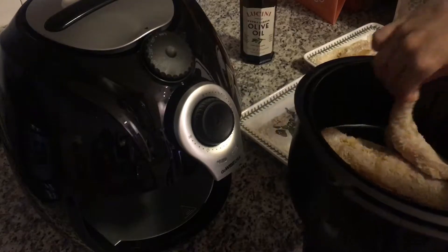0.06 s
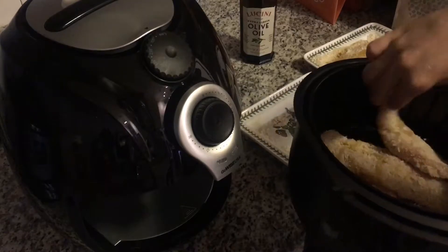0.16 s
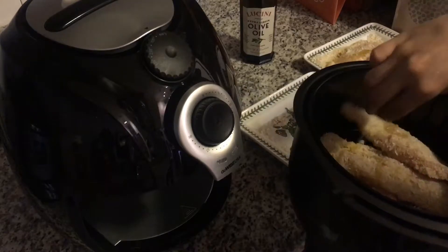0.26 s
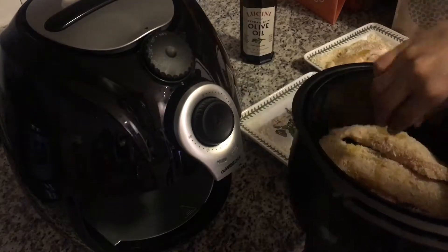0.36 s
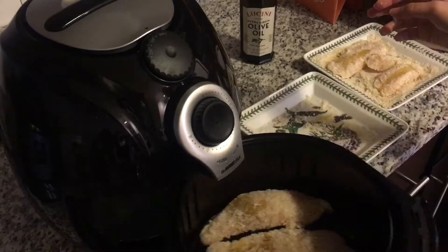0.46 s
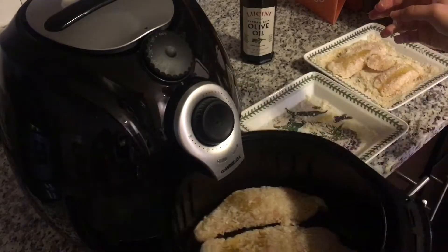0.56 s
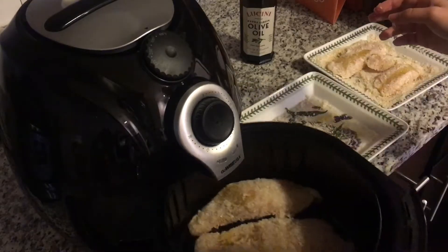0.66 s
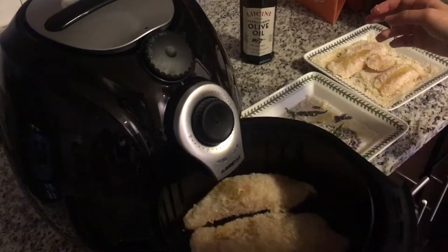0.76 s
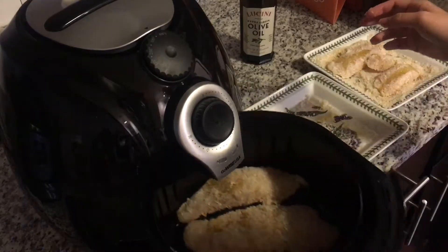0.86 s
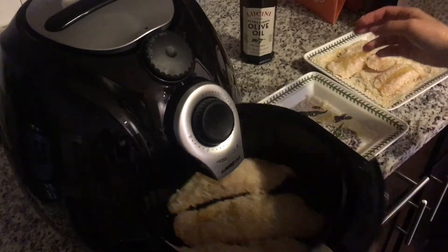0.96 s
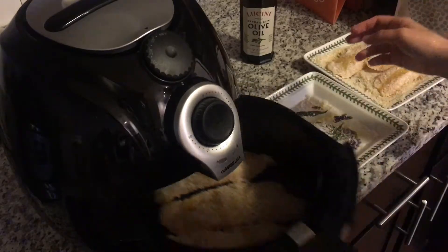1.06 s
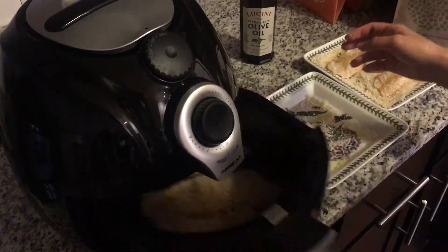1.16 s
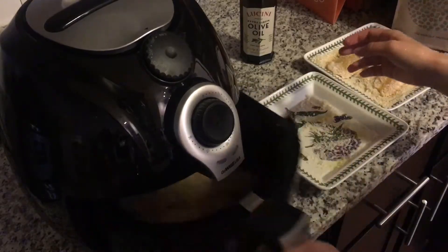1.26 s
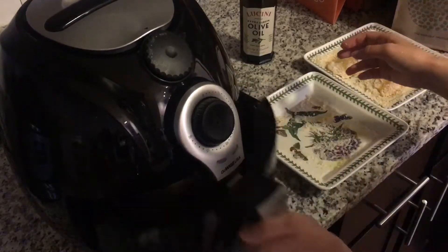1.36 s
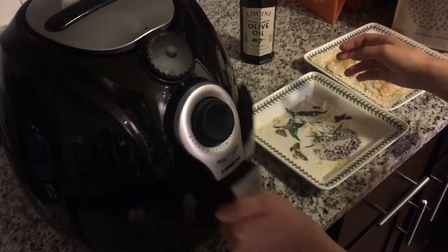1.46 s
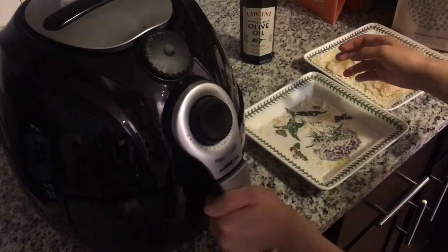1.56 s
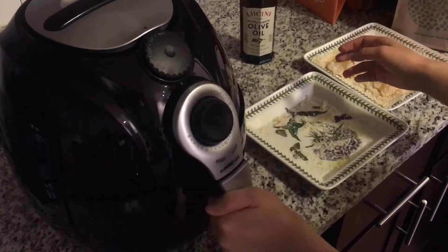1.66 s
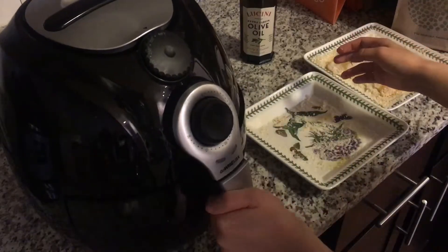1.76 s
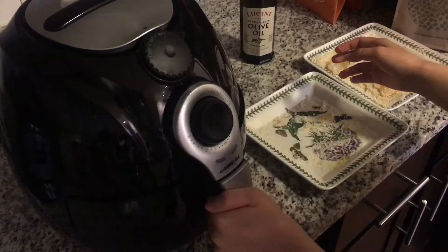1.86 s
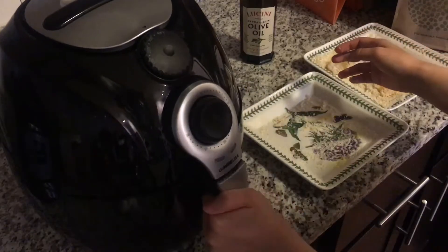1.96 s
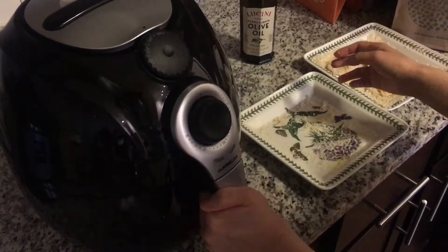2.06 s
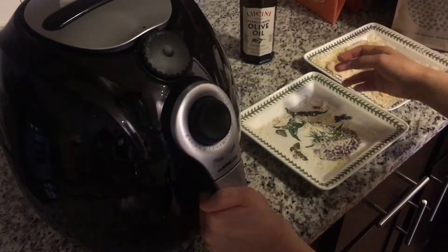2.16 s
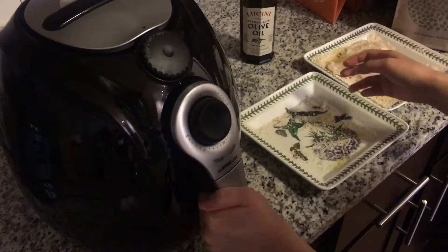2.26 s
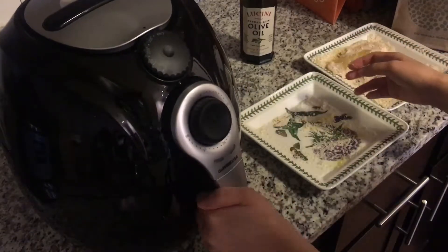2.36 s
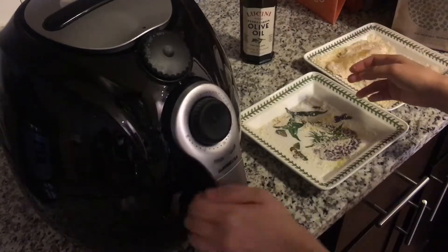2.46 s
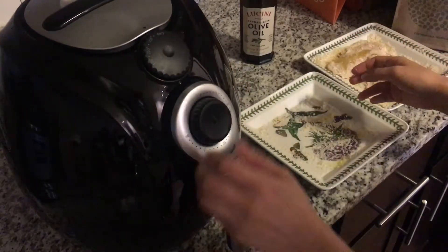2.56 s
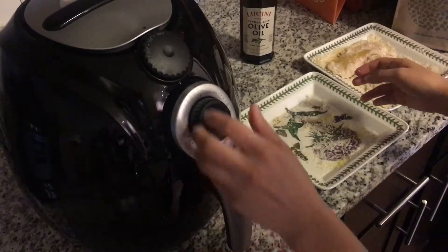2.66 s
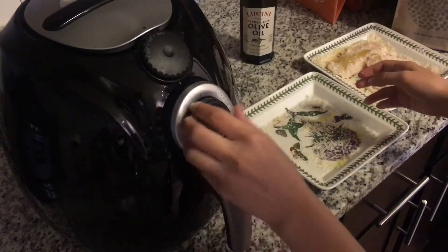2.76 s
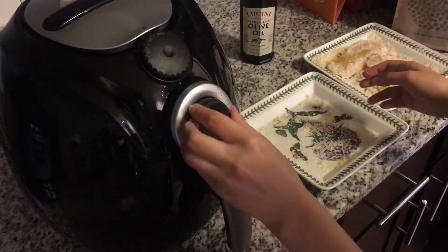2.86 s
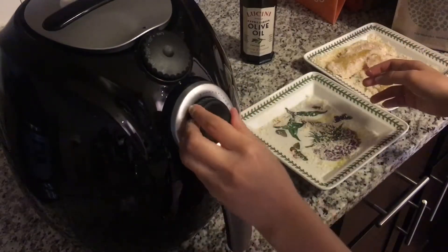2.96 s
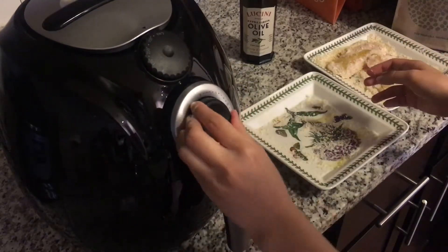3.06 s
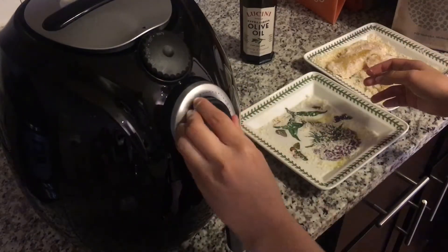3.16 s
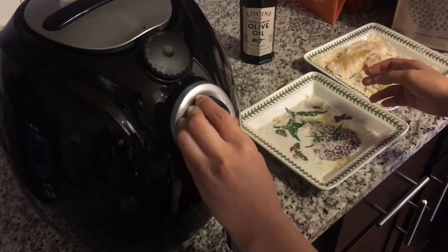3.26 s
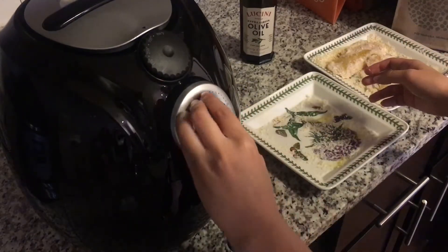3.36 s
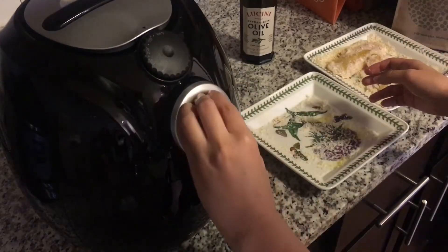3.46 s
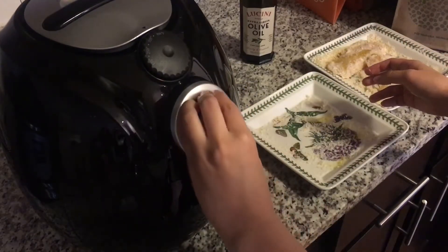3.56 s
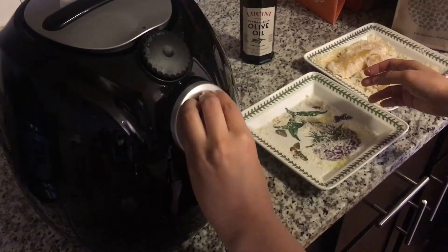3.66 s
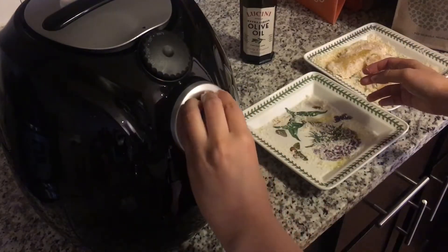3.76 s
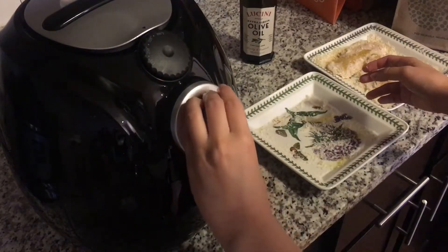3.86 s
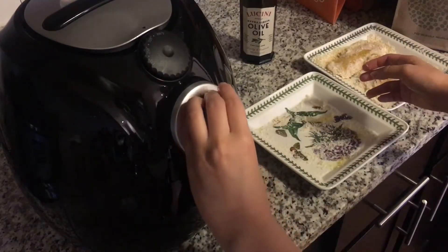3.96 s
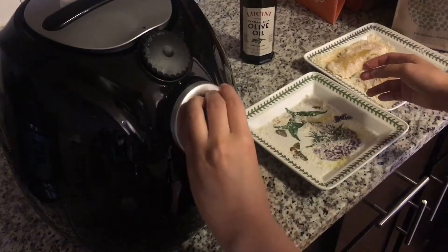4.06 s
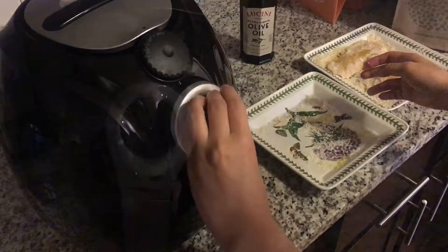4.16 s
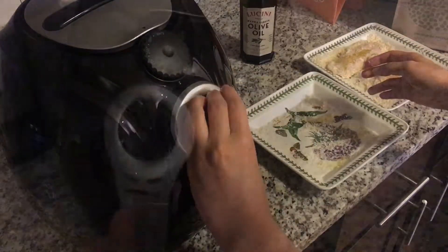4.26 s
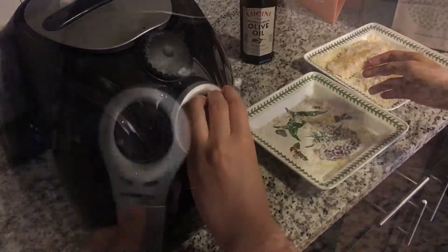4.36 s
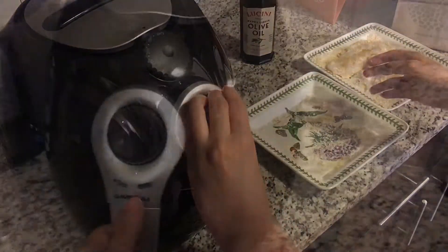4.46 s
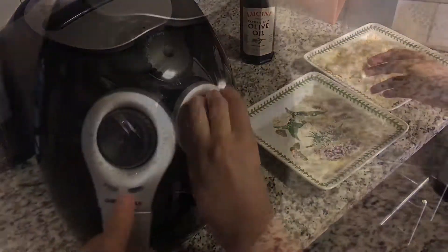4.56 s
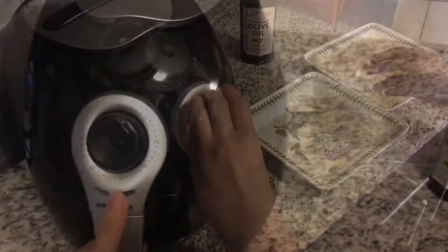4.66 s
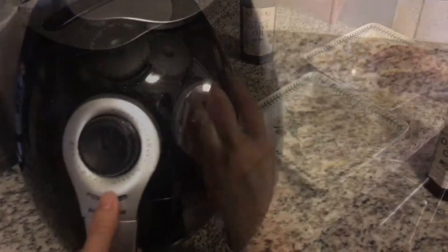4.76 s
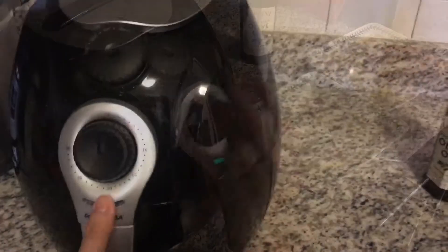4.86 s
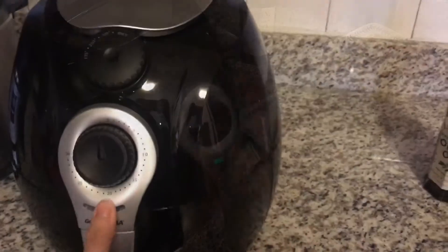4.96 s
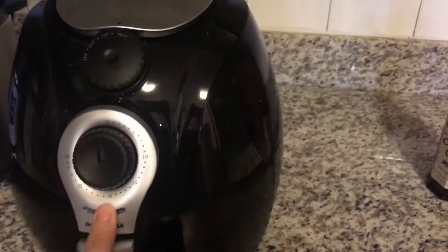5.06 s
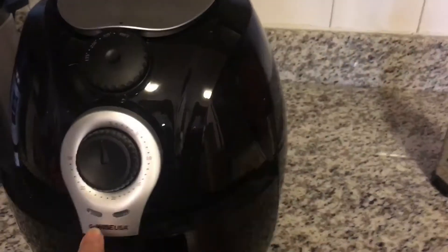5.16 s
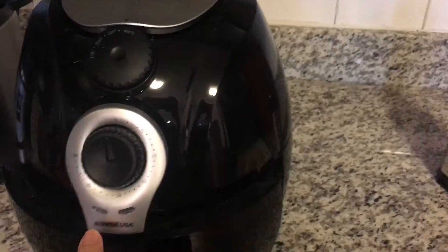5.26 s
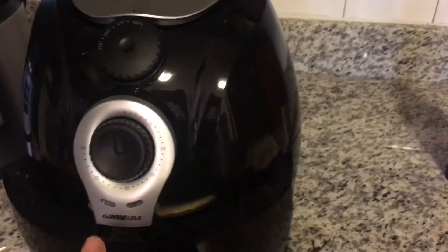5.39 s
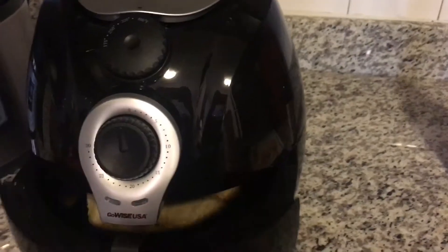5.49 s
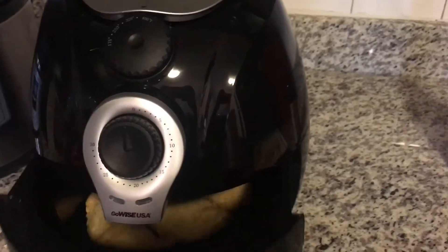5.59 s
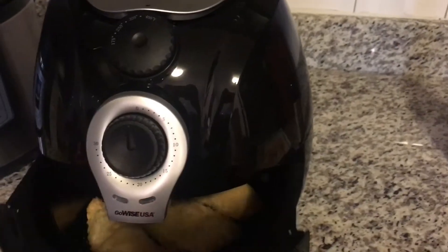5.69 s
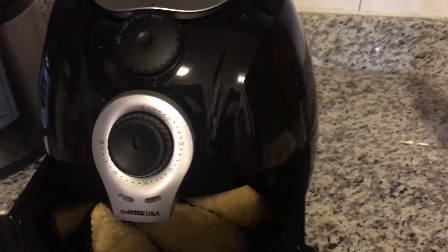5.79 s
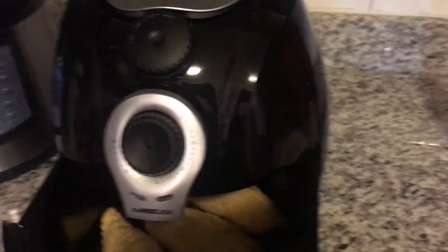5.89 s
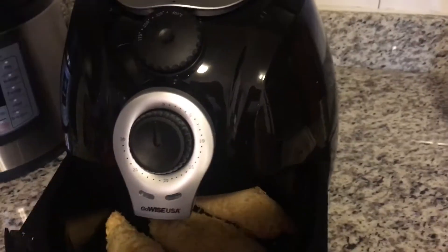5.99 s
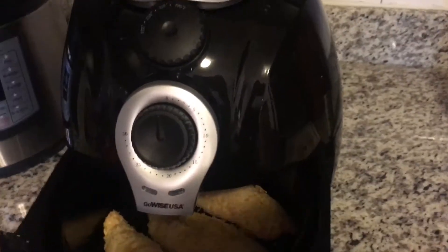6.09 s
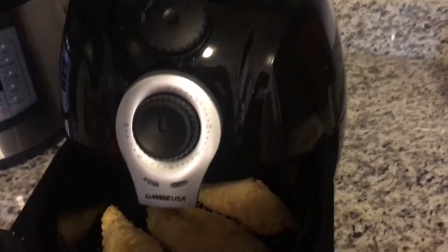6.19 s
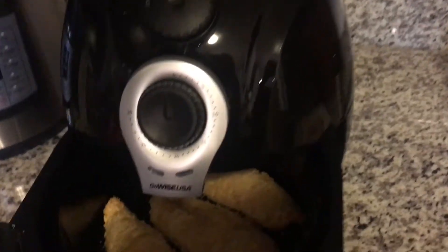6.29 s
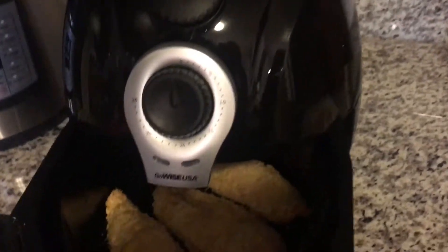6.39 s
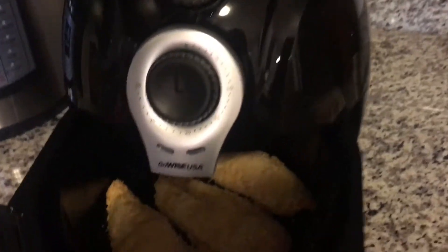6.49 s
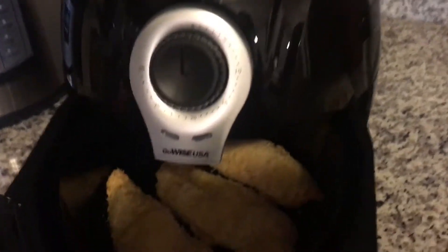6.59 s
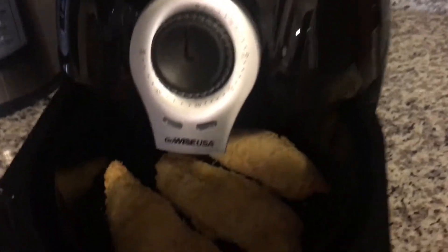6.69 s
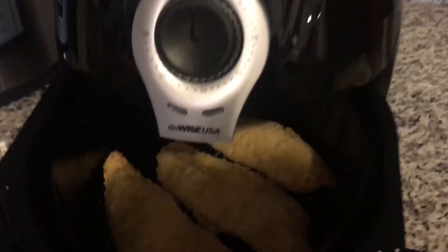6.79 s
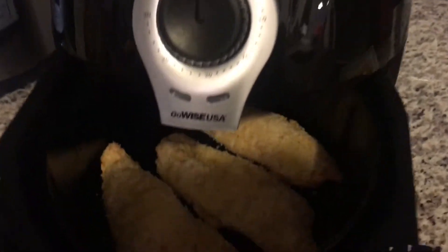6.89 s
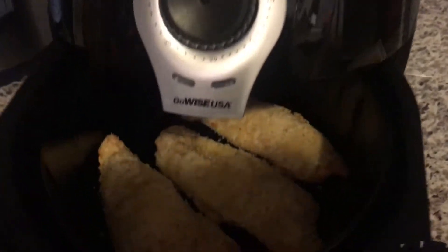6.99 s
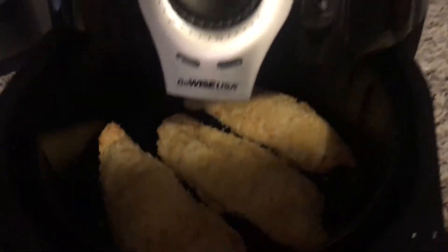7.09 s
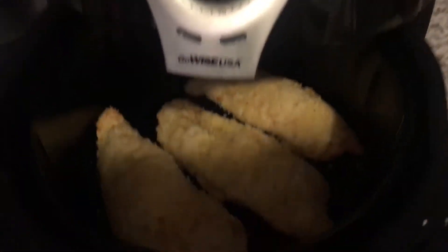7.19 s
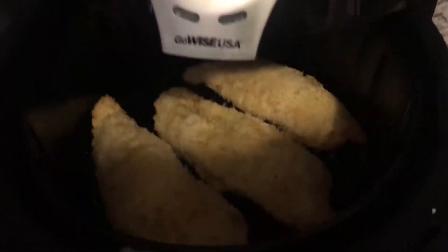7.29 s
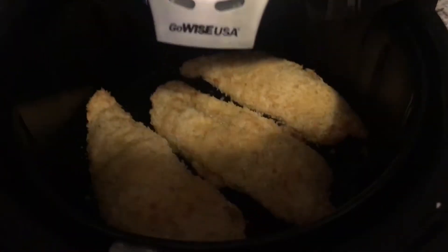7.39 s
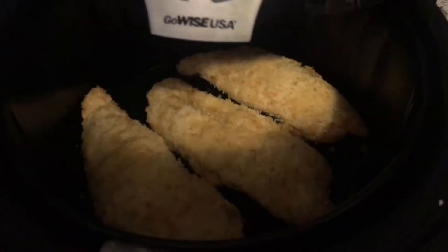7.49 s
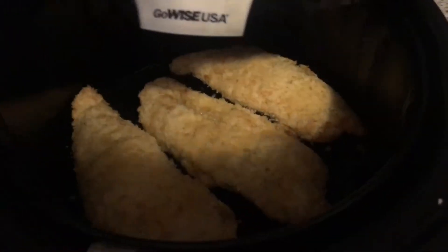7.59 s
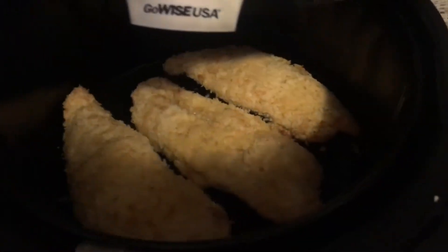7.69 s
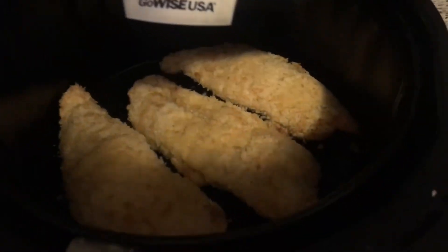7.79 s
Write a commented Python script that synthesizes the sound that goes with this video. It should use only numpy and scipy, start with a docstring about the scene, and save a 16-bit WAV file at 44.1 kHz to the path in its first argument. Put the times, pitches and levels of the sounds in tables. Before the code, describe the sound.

A close microphone in a small, hard-surfaced kitchen picks up a faint, wavering low hum and room air. From 0.2 to 0.45 s breaded food rubs with a dry, crumbly rustle, followed by a momentary dip. At 0.6 to 0.9 s a metal pan knocks sharply; it then scrapes roughly into its hollow housing, rumbling and clattering until about 1.6 s. A hard latch clack lands at 2.03 s. Small plastic clicks come near 2.4 and 2.8 s, then a timer dial ratchets rapidly from 3.15 s, slowing to steady softer ticks until about 4.5 s. The background becomes thinner. Around 4.9 to 5.3 s the pan rattles and a bright latch snap releases it at 5.13 s. It slides out more smoothly, fading by 6.5 s, with a slight rub near 7.1 s. Faint fizz and tiny falling steam squeaks continue over a deeper, growing hum to the end.

```python
"""The metal pan of an air fryer is knocked, slid into its housing and latched; later it snaps free and is drawn out.
Blows and rubbing are shaped noise that excites resonators for the sheet metal and hollow housing.
Crumbed food rubs first; noise bursts make the timer's ratchet; hot food ends in fizz and short gliding sines.
A wavering hum of sines gives way to a deeper one, over filtered room noise.
One close microphone in a small, hard kitchen."""
import sys
import numpy as np
from scipy import signal
from scipy.fft import rfft, irfft
from scipy.io import wavfile
from scipy.ndimage import uniform_filter1d

SR = 44100
rng = np.random.default_rng(int(sys.argv[2]) if len(sys.argv) > 2 else 0)


def transcribe(u):
    """Save the signal u as a 16-bit wav file named by the first command-line argument.

    u: samples, shape (n,) or (channels, n), limited to [-1, 1]; the rate is SR.
    q: integer samples, one column per channel.
    """
    v = np.clip(np.atleast_2d(u).T, -1, 1)
    q = np.round(v * 32767).astype(np.int16)
    wavfile.write(sys.argv[1], SR, q)


N = 345744
T = np.arange(N) / SR


def undb(db):
    """Decibels to gain."""
    return 10 ** (np.asarray(db) / 20)


def unit(x):
    """Scale to rms 1."""
    return x / np.sqrt(np.mean(x ** 2) + 1e-20)


def add(track, s, x):
    """Mix x into the track from time s."""
    start = max(int(s * SR), 0)
    track[start:start + len(x)] += x[:max(N - start, 0)]


def band(x, lo_hz, hi_hz, order=2):
    """Causal band-pass."""
    edges = [lo_hz, min(hi_hz, SR / 2 - 100)]
    return signal.sosfilt(signal.butter(order, edges, "band", fs=SR, output="sos"), x)


def equalise(x, points):
    """Apply a (Hz, dB) curve, interpolated over log frequency."""
    hz, db = np.transpose(points)
    f = np.maximum(np.fft.rfftfreq(len(x), 1 / SR), 1)
    gain = undb(np.interp(np.log(f), np.log(hz), db))
    return irfft(rfft(x) * gain, len(x))


def colour(x, points):
    """Shape x with a (Hz, dB) spectrum; rms 1."""
    return unit(equalise(x, points))


def resonate(x, modes, sharpen, contrast):
    """Sum resonators; sharpen narrows their widths and contrast scales their levels in dB."""
    total = 0
    for hz, width, db in modes:
        b, a = signal.iirpeak(hz, sharpen * hz / width, fs=SR)
        total = total + undb(db * contrast) * signal.lfilter(b, a, x)
    return total


def fade(t, t60):
    """Exponential decay, 60 dB down after t60."""
    return np.exp(-np.log(1000) * t / t60)


def swell(s, db):
    """Gain from a dB curve, eased to silence outside it."""
    return uniform_filter1d(undb(np.interp(T, s, db, left=-200, right=-200)), SR // 100)


def walk(rate):
    """Smooth random wander, spread near 1."""
    hold = int(SR / rate)
    steps = np.repeat(rng.standard_normal(N // hold + 1), hold)
    return unit(uniform_filter1d(steps, hold)[:N])


def grit(n, spread_db):
    """Dense tiny contacts of uneven size."""
    size_db = np.repeat(rng.standard_normal(n // 16 + 1), 16)[:n]
    return unit(rng.standard_normal(n) * undb(spread_db * size_db))


def burst(lo_hz, hi_hz, t60, rise_s, order=2, crack=0):
    """A first crack and a dying chatter of contacts in one band, rms 1 over 20 ms."""
    t = np.arange(SR // 2) / SR
    envelope = (fade(t, t60) + crack * fade(t, t60=0.0065)) * (1 - np.exp(-t / rise_s))
    x = band(grit(len(t), spread_db=1.5) * envelope, lo_hz, hi_hz, order=order)
    return x / np.sqrt(np.sum(x ** 2) / (SR // 50))


# partials of the first kitchen hum: f/Hz, level/dB
HUM_PARTIALS = [(75.6, -50), (174, -52), (355.3, -61.5)]
# spectrum of the early room air: f/Hz, relative level/dB
EARLY_AIR = [(15, -53), (25, -13), (64, 4), (92, -5), (123, -8), (175, -7.5), (223, -10), (354, -12),
             (516, -18.5), (1190, -28), (4370, -43), (4870, -48), (9320, -48), (14000, -55), (16000, -73.5)]
# spectrum of the late room air and hiss: f/Hz, relative level/dB
LATE_AIR_COLOUR = [(34, -31), (58, -5.5), (65, -6), (123, -28), (184, -23), (355, -22), (390, -31.5),
                   (470, -25.5), (517, -33), (846, -38), (1600, -45.5), (4090, -45), (4600, -46),
                   (8480, -49), (16000, -49.5)]
# the deeper hum that follows: t/s, f/Hz, level/dB
DEEP_HUM_PATH = [(5.45, 32, -62), (5.65, 33.5, -49), (5.95, 36.5, -49), (6.3, 37.5, -51), (6.5, 37.5, -59),
                 (6.7, 37.6, -52), (7.15, 37.7, -46), (7.84, 37.7, -44.5)]
EARLY_AIR_DB, LATE_AIR_DB = -48, -52


def background():
    """A wavering appliance hum and room air, giving way to a deeper hum and a thin hiss."""
    hum = 0
    for hz, db in HUM_PARTIALS:
        pitch = hz + 2 * walk(12)
        level = undb(db + 1.1 * walk(3.3))
        hum = hum + level * np.sqrt(2) * np.sin(2 * np.pi * np.cumsum(pitch) / SR)
    early = hum + undb(EARLY_AIR_DB + 0.28 * walk(4.7)) * colour(rng.standard_normal(N), EARLY_AIR)
    late = undb(LATE_AIR_DB + .5 * walk(2)) * colour(rng.standard_normal(N), LATE_AIR_COLOUR)
    s, hz, db = np.transpose(DEEP_HUM_PATH)
    deep = swell(s, db) * np.sqrt(2) * np.sin(2 * np.pi * np.cumsum(np.interp(T, s, hz)) / SR)
    fade_out, fade_in = np.interp(T, [4.45, 5.0], [1, 0]), np.interp(T, [4.5, 5.5], [0, 1])
    return early * fade_out + late * fade_in + deep


# crumbed food rubbing in the basket: t/s, level/dB
CRUMB_RUB = [(0, -64), (.22, -75.5), (.24, -54.5), (.33, -61), (.42, -59), (.45, -78)]
# spectrum of that rubbing: f/Hz, relative level/dB
CRUMB_COLOUR = [(880, -49), (1500, -12.5), (2000, -19.5), (2180, -4), (2570, -18), (3710, -7.5), (4460, -7),
                (5150, -15), (6180, -9), (7500, -15.5), (15000, -21)]
# steam squeaking out of the crust: t/s, length/s, start f/Hz, level/dB
STEAM_SQUEAKS = [(6.26, .1, 5900, -69), (6.39, .06, 5400, -64), (6.565, .075, 5600, -64),
                 (6.59, .045, 9700, -69), (6.715, .035, 5900, -64), (6.745, .03, 5500, -68),
                 (6.968, .025, 5200, -66), (7.06, .03, 5500, -65), (7.193, .035, 5400, -63),
                 (7.275, .03, 5400, -66), (7.6, .025, 5000, -66), (7.7, .03, 4700, -62),
                 (7.75, .025, 4700, -66)]
# one thin rising whistle: t/s, length/s, start f/Hz, end f/Hz, level/dB
RISING_WHISTLE = (6.05, .1, 11000, 13400, -66)
SQUEAK_FALL = .7  # each squeak sinks to this share of its pitch as the steam runs out


def food():
    """Crumbs rub as the last piece is laid in; once cooked, the crust fizzes and squeaks."""
    out = swell(*np.transpose(CRUMB_RUB)) * colour(grit(N, spread_db=-4.5), CRUMB_COLOUR)
    fizz = unit(band(grit(N, spread_db=6), 3500, 15000))
    out += swell([5.3, 6.2, 7.9], [-76, -74, -72]) * fizz
    falling = [(s, length, hz, SQUEAK_FALL * hz, db) for s, length, hz, db in STEAM_SQUEAKS]
    for s, length, start_hz, end_hz, db in falling + [RISING_WHISTLE]:
        n = int(length * SR)
        # the tiny jet sputters in pitch and strength
        hz = np.geomspace(start_hz, end_hz, n) * (1 + .025 * walk(1100)[:n])
        sputter = undb(2.5 * walk(160)[:n] + 2)
        tone = np.sin(2 * np.pi * np.cumsum(hz) / SR)
        add(out, s, undb(db) * sputter * np.sqrt(np.hanning(n)) * tone)
    return out


# speed of the timer dial as it is wound: t/s, ratchet speed/(teeth per s)
DIAL_SPEED = [(3.14, 10.2), (3.16, 55.5), (3.29, 36.7), (3.34, 30.4), (3.38, 55.5), (3.55, 50.7),
              (3.62, 25), (4.17, 24.8), (4.3, 8.5), (4.5, 21.6)]
FAST_TEETH_PER_S = 51.8  # reference speed for the tooth and knob-rub levels
# a tooth's level, its growth with speed, and its sharp tick before the tick trim
TOOTH_DB, TOOTH_DB_PER_OCTAVE, TOOTH_TICK_DB = -44.5, 10.5, -7
TOOTH_SCATTER_DB, TOOTH_JITTER_S = 1.5, .0015


def ratchet():
    """One (s, dB, tick dB) click for each tooth that passes, louder when the dial turns faster."""
    speed = np.interp(T, *np.transpose(DIAL_SPEED), left=0, right=0)
    passes = np.flatnonzero(np.diff(np.floor(np.cumsum(speed) / SR)) > 0)
    late, strong = rng.standard_normal((len(passes), 2)).T
    octaves = np.log2(np.maximum(speed[passes], 1) / FAST_TEETH_PER_S)
    db = TOOTH_DB + TOOTH_DB_PER_OCTAVE * octaves + TOOTH_SCATTER_DB * strong
    times = T[passes] + TOOTH_JITTER_S * late
    return [(s, level, TOOTH_TICK_DB) for s, level in zip(times, db)]


# single clicks of fingers, knob and small plastic parts, and the loudest teeth of the timer's ratchet:
# t/s, level/dB, sharp tick before trim/dB
SINGLE_CLICKS = [(0.231, -59.5, 14), (0.695, -53, 7.5), (1.905, -48.5, -2), (2.364, -47, -10),
                 (2.816, -48.5, -11), (2.829, -39, -6.5), (2.839, -59, 13), (3.15, -47, -5),
                 (3.365, -47, -16), (3.492, -39, -9), (3.568, -51, 5.5), (3.652, -49, -6),
                 (3.887, -49.5, -8), (3.937, -48.5, -12), (4.134, -53.5, -12), (4.056, -52.5, -15),
                 (4.561, -53, 0), (4.575, -50.5, 1.5), (4.657, -59, 2), (4.866, -60, 6.5)]
# resonances of the dial before sharpening and contrast: f/Hz, width/Hz, level/dB
DIAL_MODES = [(1104, 65, 7), (1720, 28, -4.5), (1990, 5.2, -10), (2120, 13, -13.5), (2470, 170, -14),
              (3090, 28, -7.5), (4040, 170, -8), (6100, 39, -22), (9520, 1600, -15)]
TICK_TRIM_DB = -4.5
TOOTH_RING_HZ, TOOTH_RING_DB = 3960, -4  # the spring rings at each click
KNOB_RUB_DB, KNOB_RUB_DB_PER_OCTAVE = -53.5, 22


def dial():
    """The ratchet and single clicks tick and the knob rubs, all ringing the plastic front."""
    times, speed = np.transpose(DIAL_SPEED)
    octaves = np.log2(np.maximum(speed, 1) / FAST_TEETH_PER_S)
    rub_db = KNOB_RUB_DB + KNOB_RUB_DB_PER_OCTAVE * octaves
    drive = swell(times, rub_db) * unit(band(grit(N, spread_db=4.5), 830, 4700))
    for s, db, tick_db in SINGLE_CLICKS + ratchet():
        body = burst(800, 2200, t60=.095, rise_s=.0015, order=3, crack=0.72)
        spring = burst(.8 * TOOTH_RING_HZ, 1.12 * TOOTH_RING_HZ, t60=.075, rise_s=.001, crack=0.7)
        tick = burst(4500, 11000, t60=.045, rise_s=.0006, crack=0.8)
        click = body + undb(TOOTH_RING_DB) * spring + undb(tick_db + TICK_TRIM_DB) * tick
        add(drive, s, undb(db) * click)
    front = resonate(drive, DIAL_MODES, sharpen=1.2, contrast=.25)
    return undb(-8.5) * drive + undb(-7) * front


def contact(db, brightness_db, t60, timbre):
    """One contact chatters in four bands; brightness tilts them in dB per octave about 1300 Hz."""
    octaves = np.log2(np.array([520, 1300, 3000, 9600]) / 1300)
    knock, clack, clink, click = undb(db + np.array(timbre) + brightness_db * octaves)
    x = knock * burst(440, 780, .75 * t60, rise_s=0.00067, order=3, crack=1)
    x = x + clack * burst(850, 2300, 0.62 * t60, rise_s=0.002, order=3, crack=1.3)
    x = x + clink * burst(1900, 4600, t60, rise_s=.0008, crack=0.96)
    return x + click * burst(6500, 16000, 0.65 * t60, rise_s=.0004, crack=1.3)


# knocks of the pan: t/s, level/dB, brightness/(dB per octave), deep ring before trim/dB,
# place struck (0 floor, .5 rim, 1 wall), chatter t60 before band scaling/s
PAN_BLOWS = [(0.581, -28, -2, -28, .4, 0.077), (0.761, -23, 1, -25.5, 0.64, 0.22),
             (0.779, -36.5, 1, -23.5, 0.088, 0.07), (0.859, -28, -8.5, -22.5, 0.77, 0.1),
             (0.906, -35.5, -8.5, -21, 0.28, 0.048), (1.149, -24, -4.5, -19, 0.88, 0.095),
             (1.186, -26.5, -3, -21, 0.91, .08), (1.244, -24, -2.5, -16.5, 1, .09),
             (1.26, -27.5, -3, -16, 0.19, .2), (1.36, -26.5, -3, -23, 0.64, .15),
             (1.457, -32.5, -4, -24.5, 0.56, .07), (1.533, -23, -6.5, -19, 0.38, 0.23),
             (1.576, -25.5, 0.5, -17, 0.23, 0.1), (1.974, -40.5, -2.5, -41, 0.18, 0.17),
             (2.025, -19, -2, -20.5, 0.17, 0.081), (2.06, -30.5, -8, -20.5, 0.18, 0.17),
             (2.421, -50.5, -1, -38, 0.69, 0.37), (4.923, -38, -3, -35.5, 0.29, 0.16),
             (5.099, -33.5, -4, -33.5, .2, 0.081), (5.139, -35.5, 6, -24.5, 0.38, 0.046),
             (5.156, -30, -3.5, -18, 0, 0.26), (5.206, -27.5, -6.5, -24, .2, 0.071),
             (5.301, -36, -1, -20.5, 0.095, 0.12), (5.413, -44, -5, -35, 0.46, 0.056),
             (5.691, -51.5, -9, -38.5, .3, 0.35)]
# deep modes of the pan's floor, the housing and the pan's wall: f/Hz, t60/s
DEEP_MODES = [(221, .27), (262, .13), (323, .22)]
# spring snaps of the latch, shutting and releasing: t/s, level/dB, chatter t60 before band scaling/s
LATCH_SNAPS = [(2.058, -23.5, 0.18), (2.066, -22, .065), (5.116, -37, 0.1), (5.129, -17.5, 0.13),
               (5.137, -23.5, 0.031)]
# timbre of a pan blow: hollow knock/dB, clack/dB, clink/dB, click/dB
KNOCK_TIMBRE = (0, -1.5, -1.5, -10.5)
# timbre of a latch snap: hollow knock/dB, clack/dB, clink/dB, click/dB
LATCH_TIMBRE = (-14.5, 1, 0, 0.5)
# how deep the pan sits in the housing, also used by slide(): t/s, depth (0 out, 1 home)
PAN_DEPTH = [(0.95, 0), (1.5, 0.81), (5.3, 0.82), (5.9, 0)]
FAR_MODE_DB = -18  # a deep mode loses this much when struck a whole pan away from its own place
RING_TRIM_DB = 2.5
THUD_DB, THUD_HOME_DB = -10, 6  # counter thud relative to a knock, and its gain with the pan fully home


def blows():
    """Blows chatter in the loose basket, ring the deep modes of pan and housing and thud the counter; the latch
    only snaps."""
    chatter, deep = np.zeros(N), np.zeros(N)
    t = np.arange(SR) / SR
    for s, db, brightness_db, ring_db, place, t60 in PAN_BLOWS:
        add(chatter, s, contact(db, brightness_db, t60, KNOCK_TIMBRE))
        thud_db = db + THUD_DB + THUD_HOME_DB * np.interp(s, *np.transpose(PAN_DEPTH))
        add(deep, s, undb(thud_db) * burst(48, 110, t60=0.31, rise_s=0.0054))
        for (hz, ring_t60), own_place in zip(DEEP_MODES, np.linspace(0, 1, len(DEEP_MODES))):
            # the plate's swing builds up briefly
            ring = np.sin(2 * np.pi * hz * t) * fade(t, ring_t60) * (1 - np.exp(-t / 0.0015))
            mode_db = ring_db + FAR_MODE_DB * abs(place - own_place) + RING_TRIM_DB
            add(deep, s, undb(mode_db) * ring)
    for s, db, t60 in LATCH_SNAPS:
        add(chatter, s, contact(db, 0, t60, LATCH_TIMBRE))
    return chatter, deep


RUMBLE_DB, RUMBLE_HOME_DB = 2.5, 8  # rumble relative to the rub, and its gain with the pan fully home
HISS_GROWTH = .35  # extra dB of hiss for each dB of harder rubbing


def slide(curve, gain_db, scrape_db, hiss_db, rough_db):
    """The pan slips along its rails; harder rubbing hisses more, and deep inside the housing rumbles."""
    s, db = np.transpose(curve)
    slips = undb(rough_db * (walk(50) + .75 * walk(14)))
    low, mid, high, top = (grit(N, spread_db=4) * slips for _ in range(4))
    rumble_db = RUMBLE_DB + RUMBLE_HOME_DB * np.interp(T, *np.transpose(PAN_DEPTH))
    rumble = undb(rumble_db) * unit(band(low, 270, 720))
    rub = unit(band(mid, 1050, 2000))
    scrape = undb(scrape_db) * unit(band(high, 2200, 4500))
    growth_db = HISS_GROWTH * (np.interp(T, s, db) - db.max())
    hiss = undb(hiss_db + growth_db) * unit(band(top, 5200, 14000, order=1))
    return undb(gain_db) * swell(s, db) * (rumble + rub + scrape + hiss)


def ringing(x, t60, ring_db):
    """Countless close modes of a thin panel, added to the sound that drives them."""
    t = np.arange(SR // 4) / SR
    modes = rng.standard_normal(len(t)) * fade(t, t60)
    ring = signal.fftconvolve(x, modes / np.sqrt(np.sum(modes ** 2)))[:N]
    return (x + undb(ring_db) * ring) / np.hypot(1, undb(ring_db))


# rubbing on the rails going in, before slide gain: t/s, level/dB
PUSH_RUB = [(0.6, -58.5), (0.752, -61), (0.83, -49), (0.95, -44.5), (1.2, -45), (1.38, -41.5), (1.52, -43),
            (1.66, -54), (1.76, -61.5)]
# rubbing on the rails coming out, before slide gain: t/s, level/dB
DRAW_RUB = [(5.38, -65), (5.48, -45.5), (5.85, -49), (6.38, -57.5), (6.55, -69.5), (6.8, -78.5),
            (7.05, -62), (7.22, -61), (7.35, -78)]
# thin resonances of the rails as the pan is drawn: f/Hz, width/Hz, level/dB
RAIL_MODES = [(1380, 60, -3), (1570, 70, -2), (2340, 120, 1), (3650, 30, 10), (4660, 70, 0)]
# higher modes of pan and basket before sharpening and contrast: f/Hz, width/Hz, level/dB
PAN_MODES = [(1030, 57, -1), (1290, 47, 0), (2140, 46, -6), (2340, 37, -5), (2820, 94, -11), (3320, 27, -9),
             (3690, 48, -5), (4060, 46, -13), (4310, 22, -16), (4660, 42, -11), (5070, 62, -18),
             (5270, 39, -14), (6030, 130, -16), (6640, 100, -14), (7080, 120, -15), (7430, 73, -17),
             (8090, 120, -18), (9170, 35, -20)]
# broad resonances of the hollow housing: f/Hz, width/Hz, level/dB
HOUSING_MODES = [(610, 24, -4.5), (660, 30, -18), (1026, 34, -1), (1187, 65, 0.5), (1430, 47, -5),
                 (1650, 54, -8), (2060, 51, -5.5), (2340, 57, -7.5), (2460, 60, -5), (2720, 210, -11.5),
                 (3300, 110, -3.5), (3740, 40, -3.5), (6970, 150, 0), (8750, 180, -0.5), (9620, 160, -5)]


def pan():
    """Blows and friction ring sheet metal and hollow housing; returns the near sound and the room's share."""
    chatter, deep = blows()
    pushed = slide(PUSH_RUB, gain_db=4.5, scrape_db=-1.5, hiss_db=-6.0, rough_db=3.85)
    drawn = slide(DRAW_RUB, gain_db=-6.0, scrape_db=-2.5, hiss_db=-5, rough_db=0.04)
    drawn = drawn + resonate(drawn, RAIL_MODES, sharpen=1, contrast=1)
    # pushed hard the pan sings; drawn out gently it mostly whispers
    rubbed = ringing(pushed, t60=.2, ring_db=3)
    body = ringing(chatter, t60=.035, ring_db=-8) + rubbed + drawn
    metal_drive = undb(-14) * chatter + rubbed + undb(-12) * drawn
    metal = resonate(metal_drive, PAN_MODES, sharpen=1.5, contrast=.05)
    housing = resonate(body, HOUSING_MODES, sharpen=1., contrast=1.)
    near = undb(-4.5) * body + undb(-5) * housing + undb(-2) * metal + deep
    return near, undb(-5.0) * (chatter + pushed + drawn)


def kitchen(x, wet_db, t60_low, t60_mid, t60_high):
    """Diffuse echo of tiles and cupboards, in bands above 300 Hz with their own decays; the treble dies first."""
    t = np.arange(SR) / SR
    edges = np.geomspace(300, 17000, 9)
    tail = 0
    for lo, hi in zip(edges, edges[1:]):
        t60 = np.interp(np.log(lo), np.log([400, 2000, 11000]), [t60_low, t60_mid, t60_high])
        tail = tail + band(rng.standard_normal(SR), lo, hi) * fade(t, t60)
    tail = tail * (1 - np.exp(-t / 0.0017))
    return undb(wet_db) * signal.fftconvolve(x, tail / np.sqrt(np.sum(tail ** 2)))[:N]


def scene():
    """Everything in the kitchen; the level dips briefly after the food is laid in."""
    near, spread = pan()
    small = dial() + food()
    echo = kitchen(spread + small, wet_db=-12.0, t60_low=0.82, t60_mid=0.9, t60_high=0.41)
    dip_db = np.interp(T, [.435, .458, .485], [0, -22, 0])
    return ((near + small + echo + background()) * undb(dip_db))[None]


# colour of the microphone close over the counter: f/Hz, level/dB
MIC_COLOUR = [(330, 1), (430, -4.5), (540, -2.5), (690, -4.5), (770, -0.5), (1050, 1), (4100, -2),
              (5000, -1), (6200, 2.5), (9700, -0.5), (10500, -2.5), (11500, 1), (14000, -1), (16000, -3.5)]
TOP_HZ = 15900


def record(dry):
    """The microphone colours the sound, rounds the highest peaks and cuts the top."""
    rounded = np.tanh(equalise(dry[0], MIC_COLOUR))[None]
    return signal.sosfilt(signal.ellip(8, .2, 70, TOP_HZ, fs=SR, output="sos"), rounded)


dry = scene()
out = record(dry)
transcribe(out)
```